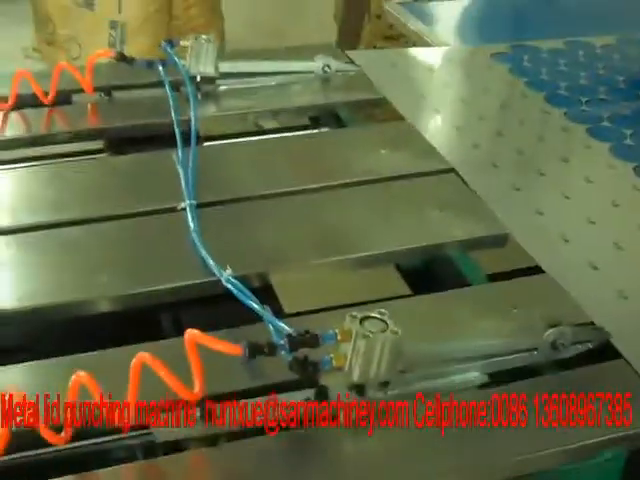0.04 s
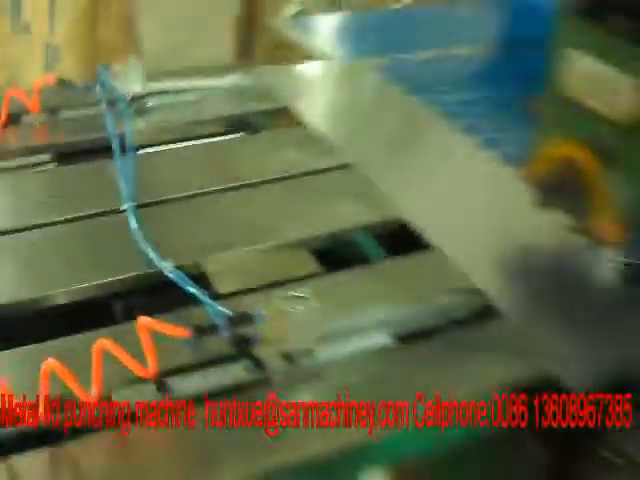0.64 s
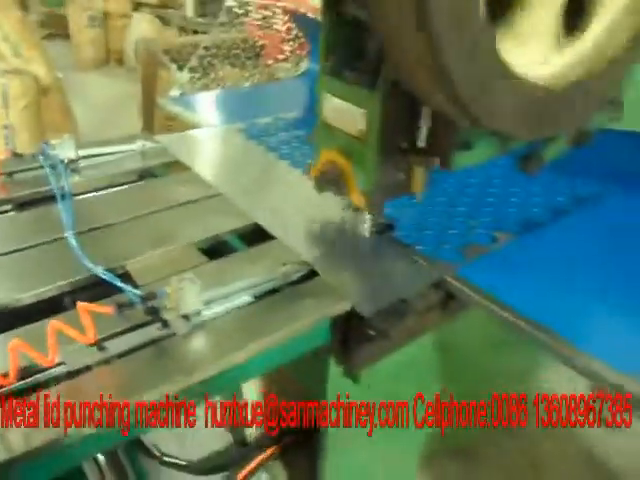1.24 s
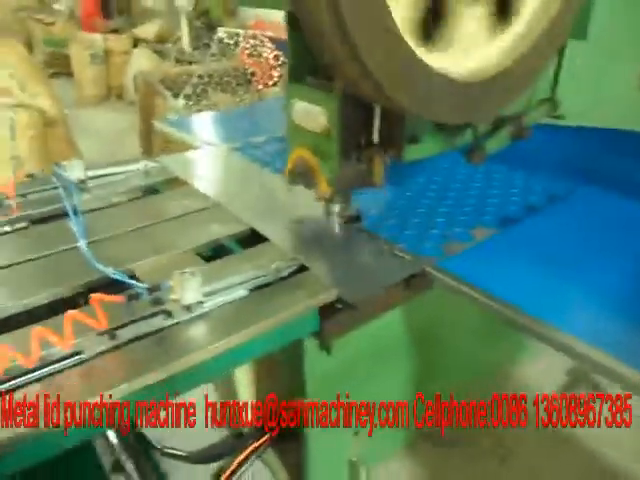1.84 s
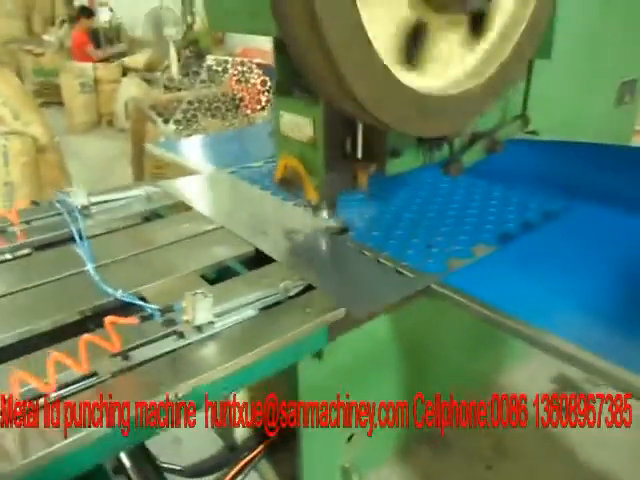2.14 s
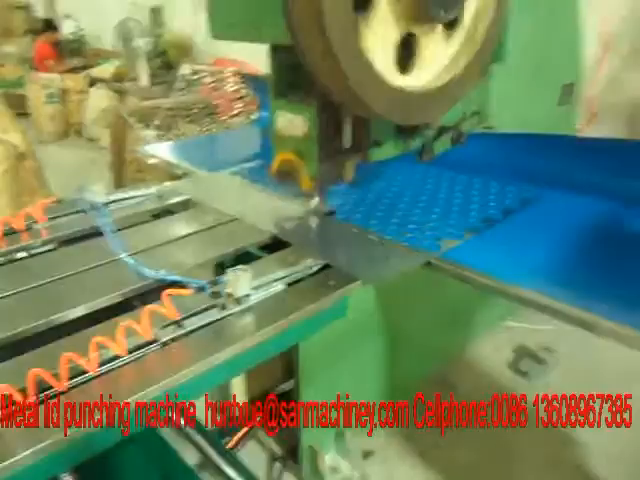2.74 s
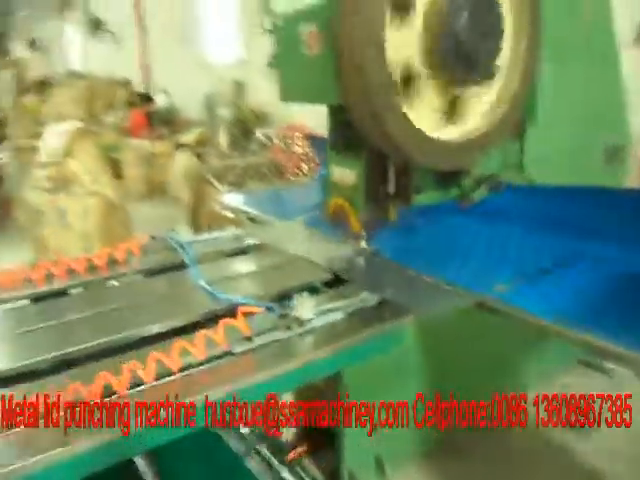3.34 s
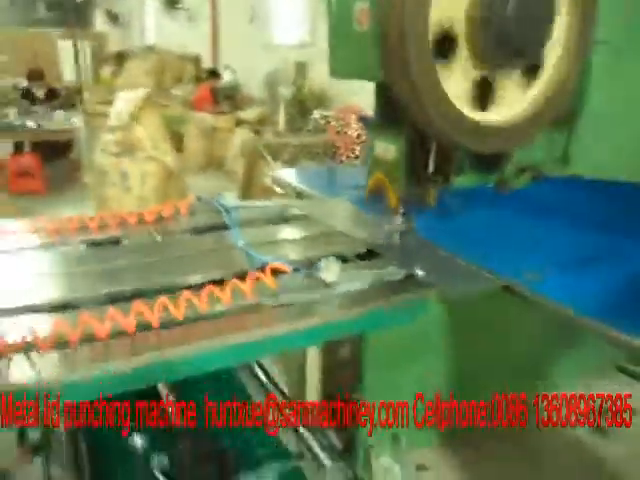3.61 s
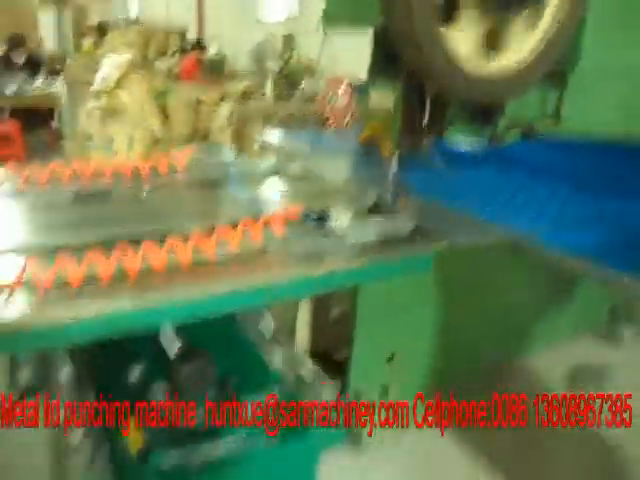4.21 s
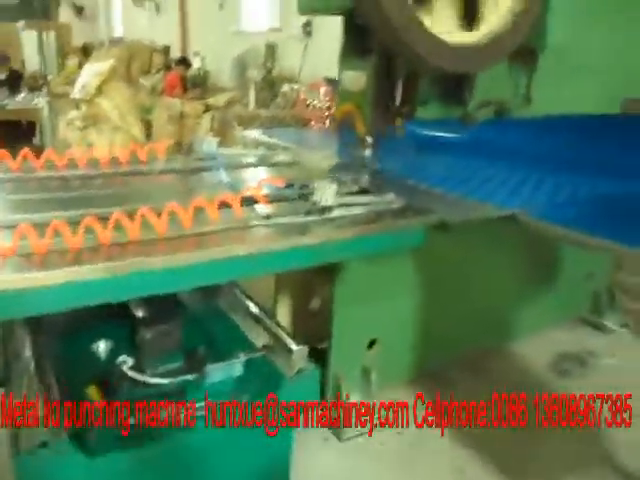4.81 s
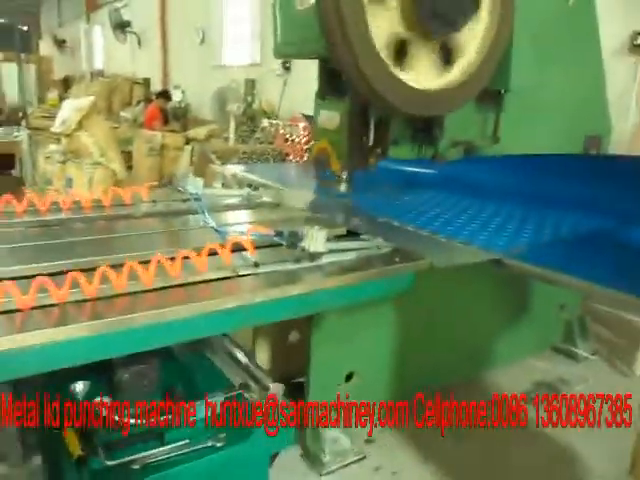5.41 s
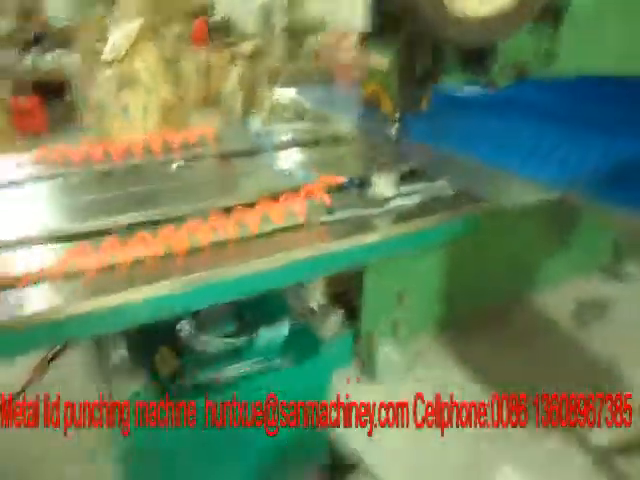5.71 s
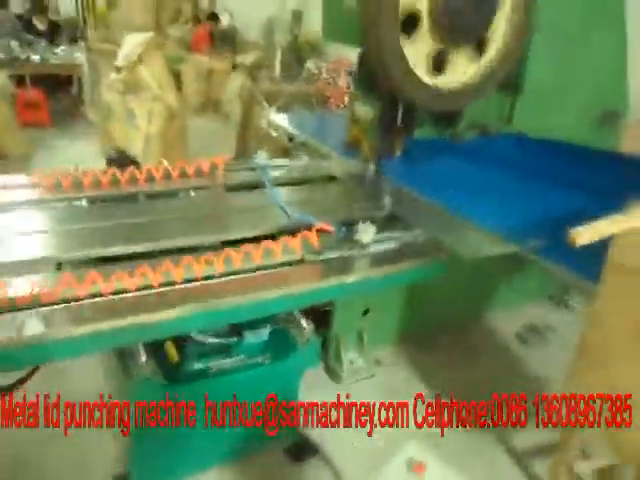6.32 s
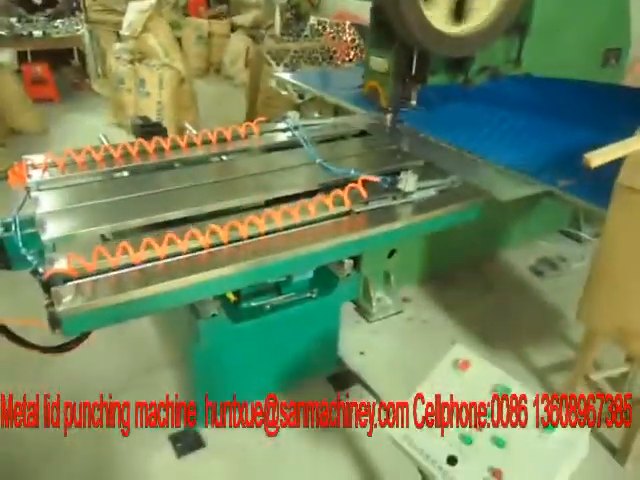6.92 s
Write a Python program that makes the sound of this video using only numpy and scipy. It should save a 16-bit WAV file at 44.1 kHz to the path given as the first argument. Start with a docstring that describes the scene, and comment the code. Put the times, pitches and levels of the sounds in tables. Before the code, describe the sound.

In a noisy workshop, a press stamps lids from tin sheet in a regular cycle of thump, clack and hiss.

```python
"""Flywheel press in a workshop

Close to a press punching lids from tin sheet, a little under two strokes a second, over the din of the shop.
Each cycle the punch clicks onto the sheet and thumps through it, the feed clacks and knocks, a steel stop
pings, and an air jet blows the lid out while the sheet slides on and wobbles. The hall echoes.
Early on, the sound cuts out for three quarters of a second."""
import sys
import numpy as np
from scipy import signal
from scipy.fft import rfft, irfft
from scipy.io import wavfile
from scipy.ndimage import uniform_filter1d, map_coordinates

SR = 44100
rng = np.random.default_rng(int(sys.argv[2]) if len(sys.argv) > 2 else 0)


def master(y):
    """Save y as 16-bit WAV."""
    cut = np.clip(np.atleast_2d(y).T, -1, 1)
    pcm = np.round(cut * 32767)  # scale
    wavfile.write(sys.argv[1], SR, pcm.astype(np.int16))


N = 315315
T = np.arange(N) / SR
AGE = T[:SR]  # time since an event began [s]

# strokes heard, timed by the flywheel: (punch meets sheet [s], blow [dB], feed [dB], stop's note [dB],
# its pitch [Hz], lid singing in the jet [dB], lid clack [dB], lid ring [dB], sheet wobble [dB])
STROKES = [(0.0374, -3.5, -8, -42, 5570, -8, -11, -26.5, -35),
           (1.1983, -8, -10, -37.5, 4950, -9.5, -21, -39, -34),
           (1.7782, -5, -6, -39.5, 5530, -10, -11.5, -34, -34.5),
           (2.3585, -3.5, -5.5, -35, 5570, -8, -7.5, -37, -29.5),
           (2.9388, -4, -5.5, -37, 5570, -8, -15, -24, -32),
           (3.518, -4, -8.5, -43, 5570, -11, -14, -17.5, -29.5),
           (4.0977, -3.5, -6, -48, 5570, -10.5, -12.5, -24, -26),
           (4.6776, -3, -6.5, -33.5, 5570, -12.5, -10, -27, -28),
           (5.2567, -3.5, -6.5, -36, 5530, -11, -20, -26, -28),
           (5.837, -2.5, -7.5, -41, 5570, -11.5, -6.5, -26, -35.5),
           (6.419, -5.5, -10, -52, 5000, -12.5, -17, -25.5, -38),
           (6.997, -5, -8, -41, 5570, -10, -16, -26, -33)]
# spectrum of metal striking metal: (frequency [Hz], level [dB])
CLACK_SPECTRUM = [(300, -8), (800, 9), (1800, -0.5), (2600, -4), (3600, -10), (4500, -3), (5600, -9.5),
                  (6500, -15), (7300, -7.5), (8200, -20.5), (10000, -17), (13000, -33.5)]
# modes of the loose lid, blown or struck: (frequency [Hz], level [dB], t60 [s])
LID_MODES = [(2476, -3, 0.053), (2692, -5, 0.056), (3177, 1, 0.029), (3580, 2, 0.025), (4200, -5.5, 0.065),
             (5350, -1.5, 0.037), (6240, -4, 0.041)]
# the crankshaft times every part of the cycle: delays after the punch meets the sheet
BLOW_LAG_S, LATCH_LAG_S, KNOCK_LAG_S = .0125, .1735, .1885
PING_LAG_S, VALVE_LAG_S, LID_LAG_S = .2225, .2672, .3495


def amp(db):
    """Decibels to gain."""
    return 10 ** (np.asarray(db) / 20)


def add(out, start_s, sound):
    """Mix a sound in at a time."""
    i = int(np.clip(start_s * SR, 0, N))
    out[i:i + len(sound)] += sound[:N - i]


def noise(spectrum, size=SR):
    """Noise of rms 1, shaped by rows of (frequency [Hz], level [dB])."""
    hz, db = np.transpose(spectrum)
    freqs = np.maximum(np.fft.rfftfreq(size, 1 / SR), 1)
    gain = amp(np.interp(np.log(freqs), np.log(hz), db)) * np.minimum(freqs / hz[0], 1)
    shaped = irfft(rfft(rng.standard_normal(size)) * gain, size)
    return shaped / shaped.std()


def walk(rate_hz, size=SR):
    """Smooth random wandering with a spread near 1."""
    hold = int(SR / rate_hz)
    steps = np.repeat(rng.standard_normal(size // hold + 1), hold)
    return uniform_filter1d(steps, hold)[:size]


def fade(t60, rise_s):
    """A swell, then an exponential decay of 60 dB in t60 seconds."""
    return np.minimum(AGE / rise_s, 1) ** 2 * np.exp(-np.log(1000) * np.maximum(AGE - rise_s, 0) / t60)


def course(rows):
    """Gain along rows of (time [s], level [dB]), dying quickly after the last."""
    times, db = np.transpose(rows)
    return amp(np.interp(AGE, times, db)) * np.exp(-np.maximum(AGE - times[-1], 0) / 0.0095)


def body(modes, rise_s, scatter_db, detune, blur_hz):
    """Ringing modes; every blow lands a little differently, and loose contacts blur each line."""
    out = np.zeros(SR)
    hold = 30  # samples
    for (hz, db, t60), (level_draw, pitch_draw) in zip(modes, rng.standard_normal((len(modes), 2))):
        n = min(int(t60 * SR), SR)
        # a random walk of the phase widens the line to blur_hz
        steps = np.repeat(rng.standard_normal(SR // hold), hold)[:n]
        wander = np.cumsum(steps) * np.sqrt(2 * np.pi * blur_hz / (SR * hold))
        phase = 2 * np.pi * hz * (1 + detune * pitch_draw) * AGE[:n] + wander
        out[:n] += amp(db + scatter_db * level_draw) * fade(t60, rise_s)[:n] * np.sin(phase)
    return out


def workshop():
    """Room tone: motor, flywheel and far machines make a steady, restless din."""
    # spectrum of the din: (frequency [Hz], level [dB])
    din_spectrum = [(20, -10.5), (55, -6), (80, -2), (120, -3.5), (280, 5.5), (450, -2.5), (850, 0),
                    (1200, -5.5), (1500, -11.5), (2400, -15.5), (3500, -22), (6000, -26), (9500, -36),
                    (11000, -54), (13000, -63)]
    return amp(-29) * noise(din_spectrum, size=N) * amp(walk(20, size=N))


def hall(sound, low_t60, high_t60, wet_db):
    """Diffuse echo of the hall: a midrange and a treble tail; little bass comes back."""
    # spectra of the tails: (frequency [Hz], level [dB])
    low = [(100, -25.5), (280, -11), (500, 1), (2500, -1), (6000, -17), (14000, -34)]
    high = [(1500, -18.5), (5000, 4), (9500, -1.5), (14000, -6.5)]
    tail = noise(low) * fade(low_t60, .019) + noise(high) * fade(high_t60, .01)
    return amp(wet_db) * signal.fftconvolve(sound, tail / np.linalg.norm(tail))[:N]


def sheet():
    """The sheet scrapes forward over the table after each stroke and wobbles like a drum skin."""
    # spectra of the flexing and the scraping tin: (frequency [Hz], level [dB])
    wobble_spectrum = [(50, -25.5), (85, -26), (103, 5), (114, 2), (130, 15), (142, 0), (160, -25.5),
                       (400, -48.5)]
    slide_spectrum = [(150, 1), (300, 3.5), (480, -5.5), (800, 5), (1180, 3.5), (1450, -6.5), (2400, -9),
                      (3500, -12.5), (9000, -34)]
    # the scrape after the valve opens: (time [s], level [dB])
    slide_course = [(0, 1), (.04, -4), (.1, 1.5), (.17, -1), (.24, -6.5), (.31, -12.5)]
    out = np.zeros(N)
    for touch_s, *_, wobble_db in STROKES:
        wobble = noise(wobble_spectrum) * fade(t60=1.0, rise_s=.23)
        add(out, touch_s + KNOCK_LAG_S, amp(wobble_db) * wobble)
        scrape = noise(slide_spectrum) * course(slide_course) * amp(2 * walk(70))
        add(out, touch_s + VALVE_LAG_S, amp(-26) * scrape)
    return out


def lids():
    """Each lid clacks against the guard and rings on as it slides away."""
    # modes of the lid once free: (frequency [Hz], level [dB], t60 [s])
    free_modes = [(2340, -3, 0.2), (2377, -1.5, .6), (2385, 5.5, 0.23), (2560, -7, 0.19)]
    out = np.zeros(N)
    for touch_s, *_, clack_db, ring_db, _ in STROKES:
        clack = amp(-7.5) * noise(CLACK_SPECTRUM) * fade(.058, .0005)
        clack += amp(-12) * body(LID_MODES, rise_s=.00085, scatter_db=.5, detune=.022, blur_hz=90)
        ring = body(free_modes, rise_s=.0024, scatter_db=2, detune=.006, blur_hz=45)
        add(out, touch_s + LID_LAG_S, amp(clack_db) * clack + amp(ring_db - 6) * ring)
    return out


def air_jet():
    """The valve snaps open; the jet hisses, splashes on the passing lid and makes the tin sing."""
    # spectra of the free jet and of air hitting the lid: (frequency [Hz], level [dB])
    jet_spectrum = [(200, -14), (900, 6.5), (1600, 3.5), (2500, -0.5), (4500, -1.5), (7000, 1), (8300, 0),
                    (10000, -2), (11000, -8.5), (14000, -19.5)]
    splash_spectrum = [(800, 2), (1900, -10.5), (2500, 3.5), (2950, -5.5), (3500, -4.5), (4300, -0.5),
                       (5600, 2), (7200, 2.5), (8200, -9), (10000, -7.5), (11000, -21.5), (14000, -44.5)]
    # their strength after the valve opens: (time [s], level [dB])
    jet_course = [(0, -2), (.02, -0.5), (.08, -1), (.1, -7.5), (.13, -7), (.15, -24)]
    splash_course = [(0, -19.5), (.018, -13.5), (.027, -1.5), (.06, -4.5), (.073, -1.5), (.086, -5),
                     (.096, -17), (.13, -23), (.15, -47)]
    round_trip_s, tumble_share = .000558, .082
    out = np.zeros(N)
    for touch_s, *_, sing_db, _, _, _ in STROKES:
        jet = amp(-10.5) * noise(jet_spectrum) * course(jet_course)
        spray = noise(splash_spectrum)
        # the splash bounces between die and tumbling lid; the changing gap shifts its resonances
        delay_s = round_trip_s * (1 + tumble_share * walk(35))
        bounce = amp(-5) * map_coordinates(spray, [(AGE - delay_s) * SR], order=1)
        splash = amp(-10) * (spray + bounce) * course(splash_course) * amp(1.49 * walk(220))
        snap = amp(-2.5) * noise(jet_spectrum) * fade(.0046, .0005)
        tin = body(LID_MODES, rise_s=.0008, scatter_db=2, detune=.04, blur_hz=60)
        buffeting = rng.standard_normal(SR) * course(splash_course)
        sing = amp(sing_db) * signal.fftconvolve(buffeting, tin / np.linalg.norm(tin))[:SR]
        add(out, touch_s + VALVE_LAG_S, amp(-12.5) * (jet + splash + snap + sing))
    return out


def feed():
    """The latch clacks twice, the carriage knocks home and rebounds, and a steel stop rings."""
    # modes of the three parts: (frequency [Hz], level [dB], t60 [s])
    latch_modes = [(1754, 2.5, 0.16), (1820, -10.5, 0.11), (3010, -8, 0.081), (4530, -12.5, .06),
                   (4600, -13, .06), (5730, -12, 0.11), (7200, -11.5, 0.046)]
    carriage_modes = [(125.9, -10, 0.2), (189.6, -3.5, 0.16), (285.7, -10, 0.22), (335, -6.5, 0.093),
                      (406, -7.5, 0.17), (632, -6.5, 0.31), (728, -16, 0.16), (744, -4.5, .14)]
    stop_modes = [(2630, -7.5, 0.15), (2740, -6, 0.21), (3150, -7.5, 0.098), (4250, -17, 0.2),
                  (4230, -15.5, 0.19), (4930, -9.5, .13), (6430, -16.5, 0.17), (7300, -20, 0.13),
                  (7950, -18.5, 0.11), (9940, -27.5, 0.18)]
    # the stop's clear note, a close pair of modes: (multiple of its pitch, level [dB], t60 [s])
    note_pair = [(1, 0.5, 0.24), (1.005, -8.5, .15)]
    # spectrum of the carriage's impact: (frequency [Hz], level [dB])
    knock_spectrum = [(40, -24.5), (180, -21), (500, -1), (750, 2.5), (1100, -5.5), (1500, -15),
                      (3000, -24), (10000, -65.5)]
    out = np.zeros(N)
    for touch_s, _, feed_db, note_db, note_hz, *_ in STROKES:
        latch = amp(-21) * body(latch_modes, rise_s=.0054, scatter_db=4.5, detune=.0037, blur_hz=35)
        latch += amp(-19) * noise(CLACK_SPECTRUM) * fade(.026, .0087)
        second_clack = amp(-19.5) * noise(CLACK_SPECTRUM) * fade(.083, .002)
        add(out, touch_s + LATCH_LAG_S, amp(feed_db) * latch)
        add(out, touch_s + LATCH_LAG_S + .01, amp(feed_db) * second_clack)

        knock = amp(-7) * body(carriage_modes, rise_s=.0053, scatter_db=0, detune=.0073, blur_hz=5.7)
        knock += amp(-11.5) * noise(knock_spectrum) * fade(.17, .00095)
        rebound = amp(-18) * noise(knock_spectrum) * fade(.09, .0036)
        add(out, touch_s + KNOCK_LAG_S, amp(feed_db) * knock)
        add(out, touch_s + KNOCK_LAG_S + .02, amp(feed_db) * rebound)

        ping = body(stop_modes, rise_s=.001, scatter_db=3, detune=.004, blur_hz=50)
        note_modes = np.multiply(note_pair, [note_hz, 1, 1])
        note = body(note_modes, rise_s=.004, scatter_db=2.5, detune=.001, blur_hz=8)
        tick = noise(CLACK_SPECTRUM) * fade(.07, .001)
        add(out, touch_s + PING_LAG_S, amp(feed_db - 20.5) * (ping + tick) + amp(note_db + 4) * note)
    return out


def punch():
    """The punch bites the tin with a double tick, then the frame takes the shock of the break-through."""
    # spectra of the first touch and of the frame's countless close modes: (frequency [Hz], level [dB])
    touch_spectrum = [(1000, -8.5), (3500, -3), (4600, -4), (6600, 2.5), (7400, -10.5), (8000, -16.5),
                      (9300, -14), (11000, -25.5), (14000, -32.5)]
    thud_spectrum = [(40, -25), (110, -15), (200, -2), (450, -5.5), (850, 2.5), (1180, -6.5), (1400, -12.5),
                     (2500, -22), (4000, -29), (7000, -47.5), (12000, -77)]
    # distinct modes of frame and die: (frequency [Hz], level [dB], t60 [s])
    low_modes = [(129, -11, 0.28), (196.5, -7.5, 0.22), (220.2, -8.5, 0.96), (270.2, 2.5, 0.61),
                 (324.3, -2.5, 0.36)]
    high_modes = [(411.6, -9.5, 0.24), (520.4, -10, 0.2), (564.5, -9.5, 0.15), (590, -14.5, 0.24),
                  (738, -15, .35), (759, -9, 0.19), (830, -13.5, 0.4), (860, -8, .22), (931, -12.5, 0.2),
                  (996, -14.5, .4), (1067, -8, 0.22), (1134, -14, 0.38), (1195, -15, 0.449),
                  (1770, -21, 0.19)]
    # the frame's bass, growing as the microphone moves back: (time [s], level [dB])
    bass_course = [(0, -19.5), (3.5, -16.5), (7, -15.5)]
    out = np.zeros(N)
    for touch_s, blow_db, *_ in STROKES:
        add(out, touch_s, amp(-25.5) * noise(touch_spectrum) * fade(.057, .0011))
        add(out, touch_s + .0095, amp(-18.5) * noise(CLACK_SPECTRUM) * fade(.07, .0014))
        blow_s = touch_s + BLOW_LAG_S
        thud_and_shudder = amp(-10) * fade(.098, .0082) + amp(-20) * fade(.41, .012)
        add(out, blow_s - .004, amp(blow_db) * noise(thud_spectrum) * thud_and_shudder)
        ring = body(high_modes, rise_s=.012, scatter_db=2, detune=.0028, blur_hz=11)
        add(out, blow_s - .003, amp(blow_db - 4.5) * ring)
        # the tin crunches as it shears
        add(out, blow_s - .006, amp(blow_db - 23.5) * noise(CLACK_SPECTRUM) * fade(.047, .0055))
        # the ram bottoms out just after the tin gives way
        add(out, blow_s + .009, amp(blow_db - 14.5) * noise(thud_spectrum) * fade(.039, .0044))
        # the heavy frame starts to bend as soon as the punch loads it
        bass = body(low_modes, rise_s=.02, scatter_db=.1, detune=.0017, blur_hz=.17)
        bass_db = np.interp(blow_s, *np.transpose(bass_course))
        add(out, blow_s - .009, amp(bass_db) * bass)
    return out


def scene():
    """One microphone by the press, with the hall's echo and the din of the shop behind."""
    knocks = punch() + feed()
    ejection = air_jet() + lids()
    echo = hall(knocks, low_t60=1.0, high_t60=.58, wet_db=-18)
    echo += hall(ejection, low_t60=1.0, high_t60=1.0, wet_db=-12)
    return (knocks + ejection + echo + sheet() + workshop())[None]


def record(dry):
    """The microphone rounds the highest peaks and dulls the top; the sound cuts out for a moment."""
    # treble response of the microphone: (frequency [Hz], level [dB])
    treble_response = [(10000, 0.5), (11000, -4.5), (11900, 1.5), (12700, -5.5), (13500, -12)]
    off_s, on_s, edge_s = .567, 1.332, .003
    top_hz = 13500
    gate = np.clip(np.maximum(off_s - T, T - on_s) / edge_s, 0, 1)
    response = amp(np.interp(np.fft.rfftfreq(N, 1 / SR), *np.transpose(treble_response)))
    heard = irfft(rfft(gate * np.tanh(dry)) * response, N)
    return signal.sosfilt(signal.ellip(10, .2, 80, top_hz, fs=SR, output="sos"), heard)


dry = scene()
out = record(dry)
master(out)
```